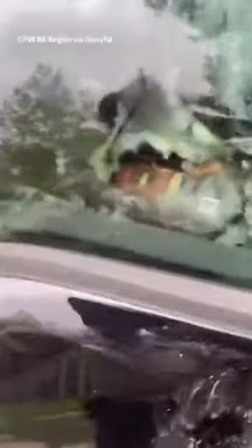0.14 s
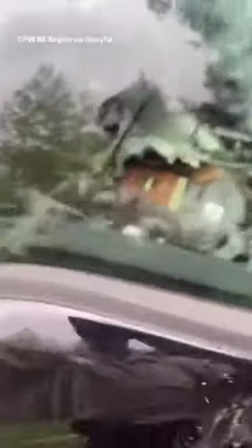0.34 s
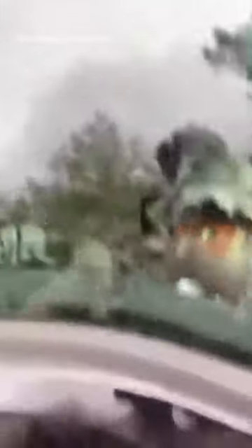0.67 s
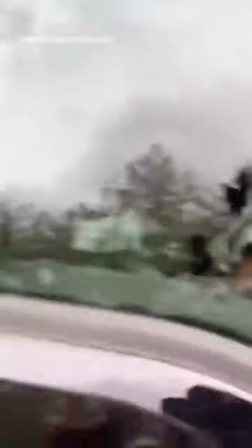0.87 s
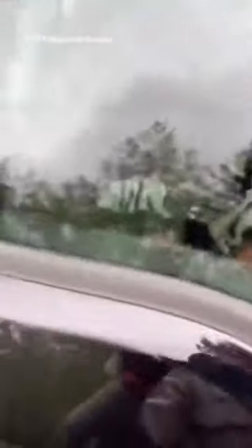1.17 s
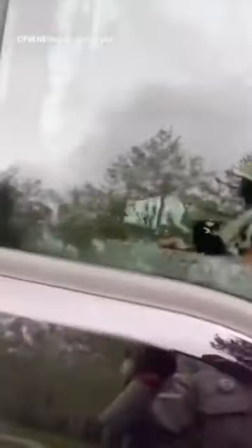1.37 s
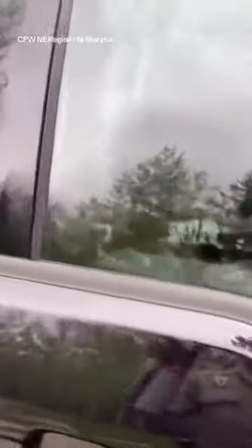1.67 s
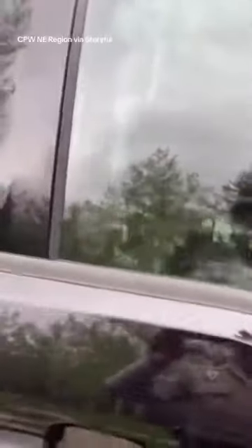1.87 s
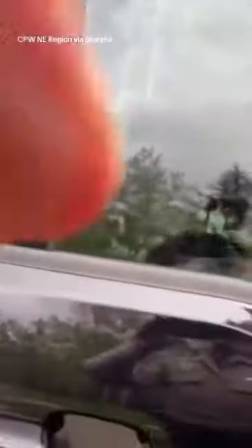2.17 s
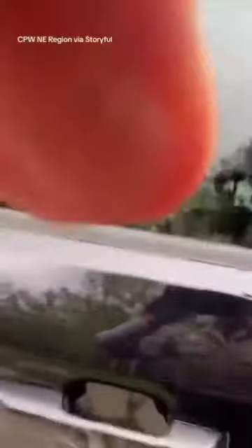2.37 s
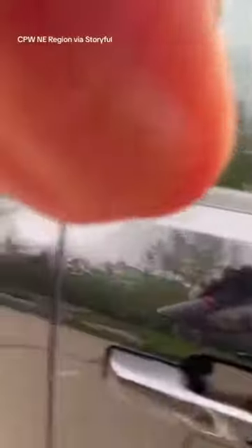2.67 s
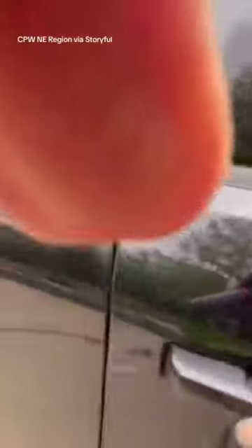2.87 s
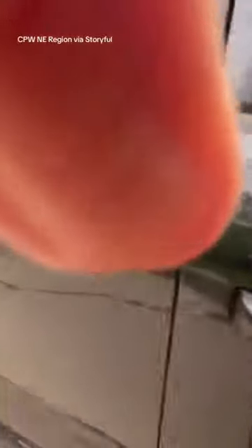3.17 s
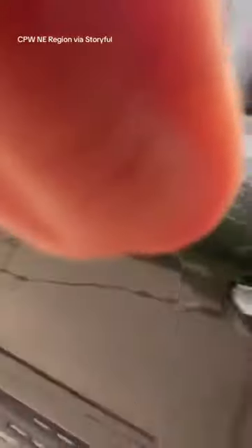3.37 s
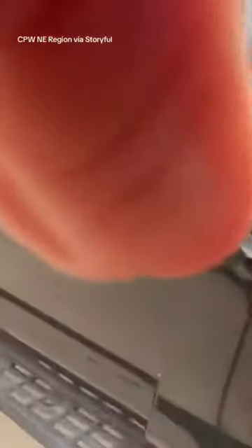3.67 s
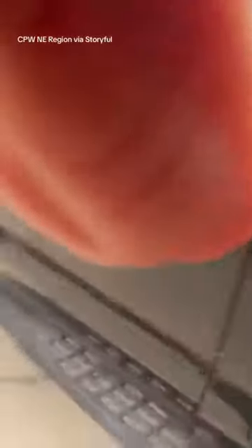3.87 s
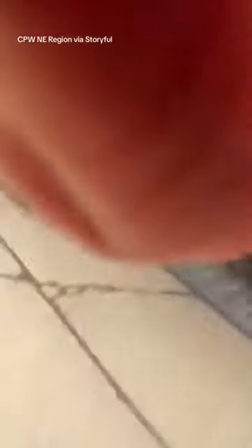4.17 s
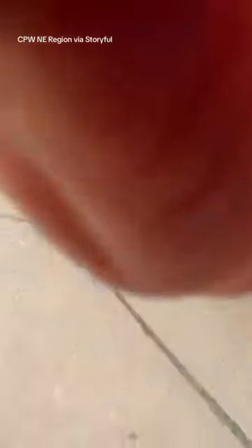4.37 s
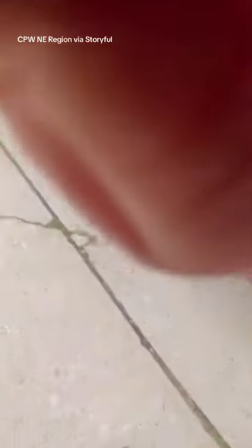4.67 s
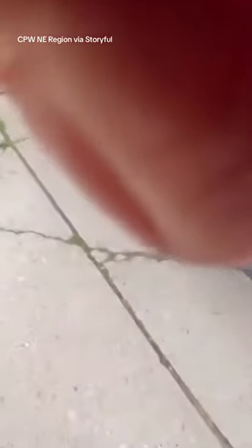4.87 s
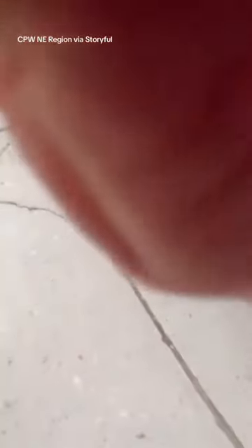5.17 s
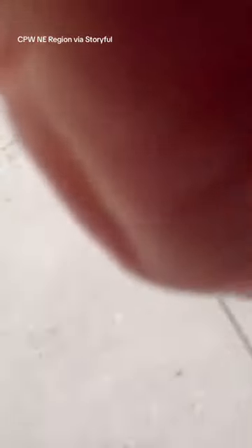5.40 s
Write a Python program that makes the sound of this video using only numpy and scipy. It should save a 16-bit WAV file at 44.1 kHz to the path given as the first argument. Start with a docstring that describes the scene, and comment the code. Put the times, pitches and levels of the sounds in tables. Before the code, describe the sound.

Outdoors beside a truck, an engine idles low and steady. Quick latch clicks and a handle clack open the scene, then a lull. Around two seconds a dense cluster of clacks ends in a deep door boom. Single hard tugs follow after three and four seconds, the latter heaviest and duller. A hand and sleeve rub the close phone microphone, roughest near the end.

```python
"""Outdoors beside a truck, someone works the latch of its door while the engine idles.
The engine is a sum of crankshaft orders over a noise rumble; hand and sleeve rub close to the phone's
microphone as grainy filtered noise. The lock clicks as noise shaped by steel resonances. The handle clacks
and the door knocks and booms as decaying modes, with a faint echo and a long ring of the steel frame."""
import sys
import numpy as np
from scipy import signal
from scipy.fft import rfft, irfft, next_fast_len
from scipy.io import wavfile
from scipy.ndimage import uniform_filter1d, map_coordinates

SR = 44100
rng = np.random.default_rng(int(sys.argv[2]) if len(sys.argv) > 2 else 0)


def int16_out(signal):
    """Quantize to a 16-bit WAV file."""
    q = np.round(np.clip(np.atleast_2d(signal).T, -1, 1) * 32767)
    wavfile.write(sys.argv[1], SR, q.astype(np.int16))


N = 244314  # samples

# Hard tugs on the handle, each a clack and then a boom of the panel. Each row: start in seconds,
# clack level in dB, clack centre in Hz, clack spread in octaves, ring length factor,
# boom level in dB, boom centre in Hz.
PULLS = [(.276, -12, 853, 0.34, 0.4, -14.5, 119.3), (.636, -33.5, 664, 0.45, 1.07, -23.5, 136),
         (1.931, -12, 730, 0.46, 0.88, -6, 91.8), (2.21, -21.5, 210, 0.36, 0.5, -11, 85.6),
         (3.274, -9, 736, 0.31, 0.63, -15.5, 152), (4.374, -6, 379, 0.43, 0.49, -10, 92.6),
         (4.998, -22.5, 375, 0.79, 0.85, -16.5, 95)]


def amp(db):
    """Level to amplitude: 20 dB is a factor of ten."""
    return 10 ** (np.asarray(db) / 20)


def unit(x):
    """Normalisation of a signal to rms 1."""
    return x / np.sqrt(np.mean(x ** 2) + 1e-20)


def along(points, hz):
    """Interpolation of (Hz, value) points on a logarithmic frequency axis."""
    f, value = np.transpose(points)
    return np.interp(np.log(hz + 1), np.log(f + 1), value)


def curves(rows):
    """Linear interpolation in time: one value per sample for each column after the seconds."""
    s, *columns = np.transpose(rows)
    return [np.interp(np.arange(N) / SR, s, column) for column in columns]


def wobble(rate):
    """Slow random fluctuation: a smooth curve through random knots, rate of them a second."""
    knots = rng.standard_normal(int(N * rate / SR) + 4)
    return map_coordinates(knots, [np.arange(N) * rate / SR])


def filtered(x, response):
    """Linear filtering: the spectrum of x times a response of frequency."""
    m = next_fast_len(len(x) + SR // 4)
    hz = np.fft.rfftfreq(m, 1 / SR)
    return irfft(rfft(x, m) * response(hz), m)[:len(x)]


def coloured(x, spectrum):
    """Spectral shaping by (Hz, dB) points, at rms 1."""
    return unit(filtered(x, lambda hz: amp(along(spectrum, hz))))


def hump(hz, centre_hz, spread):
    """A resonance-like bell of gain, Gaussian on the octave axis."""
    return np.exp(-.5 * (np.log2((hz + 1) / centre_hz) / spread) ** 2)


def add(track, s, sound):
    """Superposition: the sound is summed into the track from time s."""
    start = round(s * SR)
    sound = sound[max(-start, 0):]
    part = track[max(start, 0):][:len(sound)]
    part += sound[:len(part)]


def engine(rumble_db=-51, exhaust_lag=.12):
    """Harmonic synthesis: six cylinders' orders swell together into a throb once a crankshaft turn."""
    # The idling speed. Each row: time in seconds, crankshaft turns per second.
    idle = [(0, 13.35), (3.1, 13.35), (3.5, 13.55), (4.3, 13.55), (4.55, 13.15), (5.54, 13.15)]
    # The hum's harmonics. Each row: crankshaft order, rms level in dB before drift and nearness.
    orders = [(3, -43), (5, -41), (6, -35), (7, -71.5), (8, -44.5), (9, -67), (10, -62.5)]
    # The hum's level as the phone is lowered. Each row: time in seconds, gain in dB.
    nearness = [(0, -4.5), (1.5, -6.5), (2.5, -3), (5.54, -2.5)]
    # The noise under the hum. Each row: frequency in Hz, relative level in dB per Hz.
    rumble_spectrum = [(15, -27.5), (35, -25), (70, 6), (130, 7), (200, -14.5), (500, -13), (1200, -63)]
    turns = np.cumsum(curves(idle)[0]) / SR
    hum = np.zeros(N)
    for order, db in orders:
        drift = amp(1.5 * wobble(5))
        # the exhaust delays higher orders more, which rounds off each throb
        phase = 2 * np.pi * round(order) * turns - exhaust_lag * order ** 2
        hum += amp(db) * drift * np.sin(phase)
    rumble = coloured(rng.standard_normal(N), rumble_spectrum)
    return amp(curves(nearness)[0]) * np.sqrt(2) * hum + amp(rumble_db) * rumble


def friction(spectrum, grain_db, grain_rate, patchy_db):
    """Stick-slip of cloth or skin: noise in uneven grains whose colour shifts with the contact."""
    noise = rng.standard_normal(N) * amp(grain_db * wobble(grain_rate))
    z = signal.stft(noise, nperseg=1024)[2]
    field = uniform_filter1d(rng.standard_normal(z.shape), size=4, axis=0)  # over frequency
    field = uniform_filter1d(field, size=10, axis=1)  # over time
    patchy = signal.istft(z * amp(patchy_db * unit(field)), nperseg=1024)[1][:N]
    return coloured(patchy, spectrum)


def grit(spectrum, per_second, spread_db):
    """Random impulses: single catches of skin or cloth, sparse ticks of unequal size."""
    catches = rng.random(N) < per_second / SR
    size = amp(spread_db * rng.uniform(-1.5, 1, N))
    return coloured(catches * rng.choice([-1, 1], N) * size, spectrum)


def grip(resting_db=-55.5, jolt_db=-13, jolt_t60=0.35):
    """Powers of independent rubs add: a still hand, swells at each change of grip, a jolt at each tug."""
    # The hand shifting its grip on the phone. Each row: middle in seconds, level in dB, length in seconds.
    shifts = [(0.11, -38.5, 0.6), (0.532, -41, 0.14), (2.136, -31.5, 0.18), (2.773, -39, 0.4),
              (3.47, -41, 0.13), (4.29, -41, 0.37), (5.068, -30, 0.17), (5.447, -28.5, 0.15)]
    power, t = np.full(N, amp(resting_db) ** 2), np.arange(N) / SR
    for s, db, length in shifts:
        power += (amp(db) * np.exp(-2 * ((t - s) / length) ** 2)) ** 2
    after = t[:SR]
    for s, *_, boom_db, _ in PULLS:
        # jolt_db is relative to the boom
        add(power, s, amp(boom_db + jolt_db - 60 * after / jolt_t60) ** 2)
    return np.sqrt(power)


def handling(brush_db=-1, hiss_db=-2.0):
    """Friction noise: the hand rubs dully on the phone, the sleeve brushes and hisses, with small catches."""
    # Skin, cloth and fibre noise. Each row of the three: frequency in Hz, relative level in dB per Hz.
    skin_spectrum = [(65, -27), (110, 0.5), (242, -7), (353, -12), (440, -14), (588, -21), (848, -24),
                     (1100, -40), (1430, -50.5), (2420, -120)]
    brush_spectrum = [(410, -37.5), (700, 5), (864, -10), (963, 1), (1330, -9), (1940, 0.5), (2430, -6),
                      (2980, -6), (3320, -39.5), (4500, -30.5), (5850, -58), (9900, -120)]
    hiss_spectrum = [(1940, -38), (3300, 1), (4370, -4.5), (5300, -5), (7060, 0), (7630, -7.5), (9350, -6),
                     (10100, -38.5), (10500, -51.5), (13600, -74), (22000, -120)]
    # The sleeve sweeping past. Each row: time in seconds, level of the brushing in dB before brush_db,
    # level of its treble in dB before hiss_db.
    sweep = [(0, -40, -53), (.3, -49, -58.5), (.55, -52, -57), (.8, -59, -62), (1.82, -64.5, -68.5),
             (2, -50, -54), (2.2, -46, -50.5), (2.33, -60, -61.5), (2.9, -51, -61), (3.08, -60, -61.5),
             (3.36, -57, -61.5), (3.7, -59, -66), (4.22, -59, -56), (4.46, -59.5, -65.5),
             (4.86, -68, -67.5), (5.04, -43, -45.5), (5.26, -53, -57.5), (5.38, -42.5, -45),
             (5.54, -44, -47.5)]
    brush, hiss = curves(sweep)
    pressure = amp(1.2 * wobble(18))
    skin = friction(skin_spectrum, grain_db=2.5, grain_rate=90, patchy_db=2.5)
    skin += .43 * grit(skin_spectrum, 45, spread_db=4)
    sleeve = friction(brush_spectrum, grain_db=1.0, grain_rate=170, patchy_db=2.5)
    sleeve += .28 * grit(brush_spectrum, 49, spread_db=7)
    fibres = friction(hiss_spectrum, grain_db=0.5, grain_rate=270, patchy_db=3)
    fibres += .3 * grit(hiss_spectrum, 120, spread_db=6.5)
    rubbing = grip() * skin
    brushing = amp(brush + brush_db) * sleeve
    hissing = amp(hiss + hiss_db) * fibres
    return pressure * (rubbing + brushing + hissing)


def scuffs(grain_db=3):
    # Scrapes of hand and sleeve. Each row: middle in seconds, level in dB, length in seconds,
    # centre in Hz, spread in octaves.
    scrapes = [(0.026, -41, 0.22, 1120, 0.49), (.065, -55, 0.18, 5930, 0.083),
               (0.338, -48.5, 0.15, 1170, 0.28), (0.543, -47, 0.1, 1080, 0.23),
               (0.682, -48.5, 0.058, 4600, 1.06), (0.952, -43, 0.022, 3020, 1.5),
               (1.018, -47, 0.093, 2860, 1.44), (1.337, -40.5, 0.044, 7200, 0.23),
               (2.503, -41.5, 0.042, 1720, 0.41), (2.663, -48.5, 0.01, 4870, 1.9),
               (2.903, -50, 0.14, 2980, 1.5), (3.826, -57.5, 0.067, 4950, 1.5),
               (4.169, -46.5, 0.056, 7700, 0.67), (4.176, -52, 0.076, 1730, 0.5),
               (4.311, -47, 0.028, 7400, 0.22), (5.166, -38.5, 0.064, 4000, 0.8),
               (5.445, -38.5, 0.17, 443, 0.61)]
    out, t = np.zeros(N), np.arange(-SR // 8, SR // 8) / SR
    grain = friction([(400, 8), (2000, 3.5), (10000, -9)], grain_db, grain_rate=100, patchy_db=5.5)
    for s, db, length, centre_hz, spread in scrapes:
        piece = np.roll(grain, -round(s * SR))[:len(t)]
        stroke = unit(filtered(piece, lambda f: hump(f, centre_hz, spread)))
        add(out, s + t[0], amp(db) * stroke * np.exp(-2 * (t / length) ** 2))
    return out


def latch(level_db=2, hold=0.00022, rise=0.00082, ring_db=4, skirt_db=-17, skirt_t60=.04,
          bounce=0.79, bounce_gap=0.0043):
    """Impact of resonant steel: parts strike and chatter, bounce once and ring briefly (times in s)."""
    # Contacts in latch and lock. Each row: contact in seconds, level in dB before level_db,
    # brightness in dB, t60 in seconds.
    clicks = [(0.1039, -33.5, -21.5, 0.19), (0.1657, -20, -6.5, 0.022), (.215, -27.5, -4.5, 0.049),
              (0.2745, -21, -3.5, 0.045), (0.4577, -42, -9, 0.054), (0.8204, -40.5, -3, 0.015),
              (1.317, -35.5, -8.5, 0.14), (1.76, -30, -2, 0.029), (1.779, -44, 12, 0.036),
              (1.8076, -40, 0, 0.1), (1.895, -22, -12.5, 0.065), (1.919, -19, -9, 0.097),
              (1.931, -16, -7.5, 0.076), (2.1161, -26, -0.5, 0.048), (2.196, -36.5, -11.5, 0.13),
              (2.3027, -42, -6, 0.027), (2.375, -50, -3, 0.3), (2.476, -41, -12, 0.3),
              (2.8848, -46.5, -3, 0.077), (2.9967, -43.5, -14.5, 0.11), (3.2739, -13.5, -8.5, 0.036),
              (3.576, -47.5, -5, 0.1), (3.8822, -48, -21, 0.044), (4.3728, -24, -13, 0.098),
              (4.6706, -41.5, -6.5, 0.036), (4.7107, -49.5, -7, 0.053), (4.9989, -27, 7.5, .078),
              (5.1765, -24, -6.5, .04), (5.3521, -32, -6, 0.057)]
    # The latch's resonances. Each row: frequency in Hz, width in Hz, strength in dB, halved below.
    resonances = [(2156, 370, 4.5), (2930, 710, -8.5), (3810, 79, -9), (5300, 170, -20), (5970, 70, -26),
                  (6410, 1500, -4), (9430, 1500, 23.5)]
    out, t = np.zeros(N), np.arange(-SR // 20, SR // 4) / SR
    after = np.maximum(t, 0)

    def steel(f):
        """Resonance: a sum of peaks above a flat response."""
        peaks = sum(amp(db / 2) / (1 + (2 * (f - hz) / width) ** 2) for hz, width, db in resonances)
        return 1 + amp(ring_db) * peaks

    for s, db, bright_db, t60 in clicks:
        tick_db = bright_db - 7  # the top octave lies under the upper mids
        colour = [(300, -2), (1100, -2.5), (2200, -4.5), (4500, bright_db),
                  (7500, tick_db), (10000, tick_db - 19.5)]
        noise = rng.standard_normal(len(t))
        chatter = unit(filtered(noise, lambda f: steel(f) * amp(along(colour, f))))
        gap = round(bounce_gap * rng.uniform(.5, 2) * SR)
        chatter = unit(chatter + bounce * np.roll(chatter, gap))  # the bounce repeats the same ring
        strike = amp(-60 * np.maximum(t - hold, 0) / t60) * (1 - np.exp(-after / rise))
        skirt = amp(skirt_db - 60 * np.abs(t) / skirt_t60)  # faint noise before and after the click
        add(out, s + t[0], amp(db + level_db) * (strike + skirt) * chatter)
    return out


def ring(centre_hz, spread, length, rise_cycles=0.15, rattle=0.48, scatter_db=2.5):
    """Modal excitation: one blow rings the door's modes around its own centre; loose trim rattles along."""
    # Panels and handle. Each row: frequency in Hz, level in dB before scatter,
    # t60 in seconds before the length factor.
    door_modes = [(50.26, 7, 0.25), (66.3, -1, 0.24), (92.3, 1.5, 0.13), (125, -1.5, 0.23),
                  (157.2, 0.5, 0.29), (197.5, 0.5, 0.12), (244.7, -0.5, 0.16), (302, -2.5, 0.21),
                  (348, -2.5, 0.23), (427, -6, 0.15), (485.7, 4, 0.088), (535.4, 1.5, 0.16),
                  (625, 9.5, 0.044), (732, -7.5, 0.13), (775, 5.5, 0.019), (837, 4.5, 0.047),
                  (938, -4.5, 0.072), (1076, -2.5, 0.11), (1260, -28.5, 0.11), (1236, -4, 0.03),
                  (1506, -10.5, 0.053), (1650, -8, 0.034), (1799, 5.5, 0.045), (2020, -13.5, 0.068),
                  (2060, 13, 0.088), (2500, -10, 0.077), (2653, -0.5, 0.11), (2900, -4, 0.082),
                  (2620, -6, 0.074)]
    t = np.arange(SR // 2) / SR
    hz, mode_db, t60 = np.transpose(door_modes)[:, :, None]
    sign = (-1) ** np.arange(len(door_modes))[:, None]  # neighbouring modes swing against each other
    size = hump(hz, centre_hz, spread) * amp(mode_db + rng.normal(0, scatter_db, hz.shape))
    decay = amp(-60 * t / (t60 * length))
    modes = np.sum(sign * size * decay * np.sin(2 * np.pi * hz * t), axis=0)
    life = length * np.interp(centre_hz, hz[:, 0], t60[:, 0])
    trim = unit(filtered(rng.standard_normal(len(t)), lambda f: hump(f, centre_hz, spread)))
    trim = trim * amp(-60 * t / life)
    onset = 1 - np.exp(-t * centre_hz / rise_cycles)
    blow = (modes / np.linalg.norm(size) + rattle * trim) * onset
    return blow / np.sqrt(uniform_filter1d(blow ** 2, size=SR // 125).max())  # strongest 8 ms at rms 1


def body():
    """Low-mode response: the door panel's low body sounds under each blow, at -13 dB."""
    return amp(-13) * ring(centre_hz=307, spread=0.47, length=0.66)


def door(boom_lag_s=.008, boom_width_hz=48.3, boom_ring=1.15):
    """Struck modes: a tug clacks the handle and the panel booms; knocks ring with a low body and no boom."""
    # Knocks on handle and door, and low bumps of the hand on the phone. Each row:
    # start in seconds, level in dB, centre in Hz, spread in octaves, ring length factor.
    knocks = [(.105, -32, 2380, 0.2, 0.25), (0.219, -26.5, 470, 0.89, 0.72), (0.541, -26, 71.5, 0.58, 1.2),
              (1.763, -26, 1110, 1, 0.084), (1.777, -32.5, 705, 0.99, 0.48),
              (1.807, -25.5, 833, 0.56, 1.74), (1.895, -16, 1056, 0.3, 1.46),
              (1.92, -18.5, 2380, 0.09, 1.2), (2.116, -27.5, 674, 0.71, 0.88), (2.197, -33, 830, 0.62, 2.2),
              (2.378, -38, 580, 0.16, 0.61), (2.478, -25, 840, 0.2, .66), (2.705, -26, 133, 0.42, 1.1),
              (2.779, -35, 620, 0.83, 0.74), (2.8, -30.5, 165, 0.94, 0.77), (3.275, -13, 1546, 0.13, 0.87),
              (4.376, -25, 825, 0.23, 2), (4.762, -48, 655, 0.81, 2.3), (4.785, -30.5, 134, .3, 1.7),
              (5.149, -28, 836, 0.21, 0.57)]
    out = np.zeros(N)
    for s, db, centre_hz, spread, length, boom_db, boom_hz in PULLS:
        add(out, s, amp(db) * (ring(centre_hz, spread, length) + body()))
        boom = ring(boom_hz, boom_width_hz / boom_hz, boom_ring)
        add(out, s + boom_lag_s, amp(boom_db) * boom)
    for s, db, centre_hz, spread, length in knocks:
        add(out, s, amp(db) * (ring(centre_hz, spread, length) + body()))
    return out


def yard(x):
    """Reverberation: a short outdoor echo whose decay time depends on frequency."""
    # Echo of truck side and pavement. Each row: frequency in Hz, t60 in seconds.
    echo_t60 = [(100, 0.72), (500, 0.27), (2500, 0.26), (9000, 0.27)]
    hz, t, z = signal.stft(rng.standard_normal(SR // 2), SR, nperseg=256)
    decay = amp(-60 * t / along(echo_t60, hz)[:, None])
    tail = signal.istft(z * decay, SR, nperseg=256)[1]
    return signal.fftconvolve(x, tail / np.linalg.norm(tail))[:N]


def frame():
    """Free vibration: the heaviest blow leaves a faint, long ring of decaying sines in the steel frame."""
    # The frame's modes. Each row: frequency in Hz, level relative to the blow in dB, t60 in seconds.
    frame_modes = [(312, -8, .6), (355, -4, .7), (533, -13, .9), (702, 0, .9)]
    # The blow that sets the frame ringing: its time in seconds, level in dB.
    slam = (4.376, -43)
    out, t = np.zeros(N), np.arange(SR) / SR
    s, slam_db = slam
    for hz, db, t60 in frame_modes:
        add(out, s, amp(slam_db + db - 60 * t / t60) * np.sin(2 * np.pi * hz * t))
    return out


def scene(echo_db=-17):
    """Superposition: door and latch close by, over the handling and the engine."""
    background = engine() + handling() + scuffs()
    blows = latch() + door()
    return (background + blows + amp(echo_db) * yard(blows) + frame())[None]


def record(dry, top_hz=10100):
    """Saturation and band limit: the phone rounds off the highest peaks and cuts steeply above top_hz."""
    held = dry[0] / (1 + np.abs(dry[0]) ** 6) ** (1 / 6)
    return filtered(held, lambda hz: 1 / np.sqrt(1 + (hz / top_hz) ** 100))[None]


dry = scene()
out = record(dry)
int16_out(out)
```